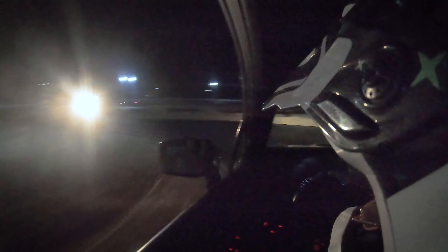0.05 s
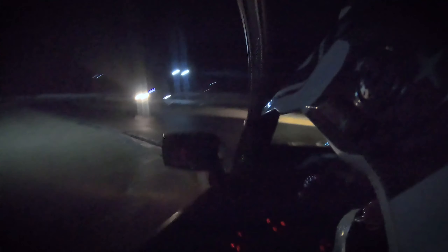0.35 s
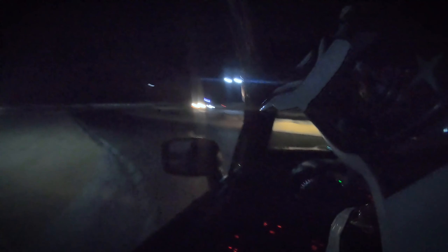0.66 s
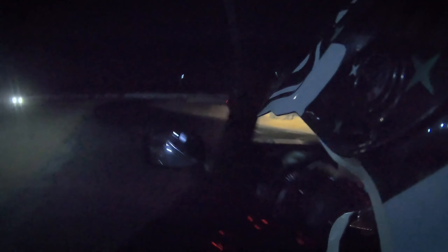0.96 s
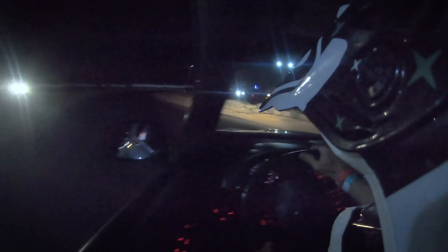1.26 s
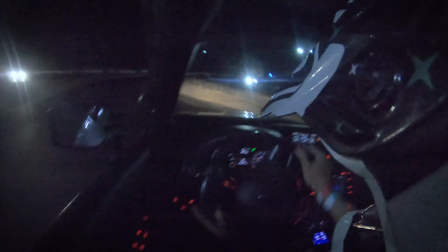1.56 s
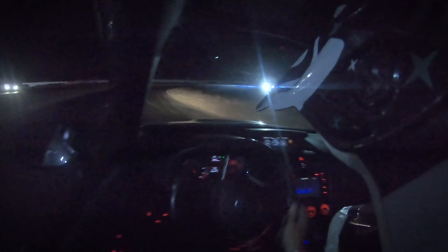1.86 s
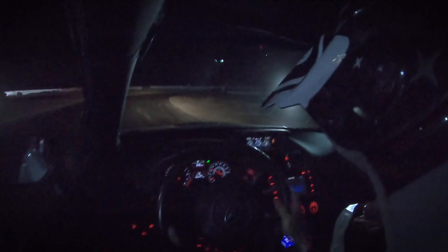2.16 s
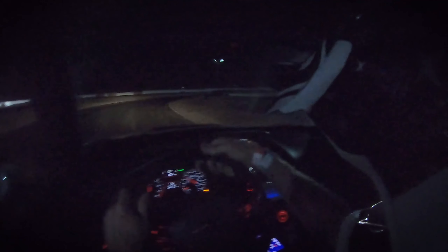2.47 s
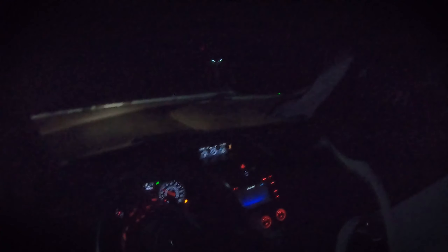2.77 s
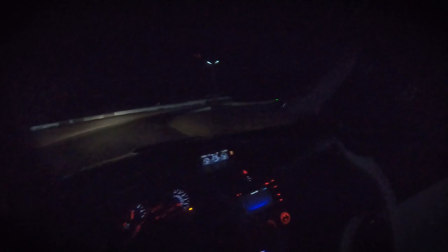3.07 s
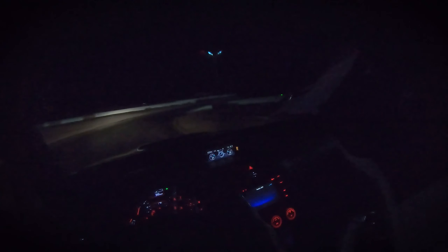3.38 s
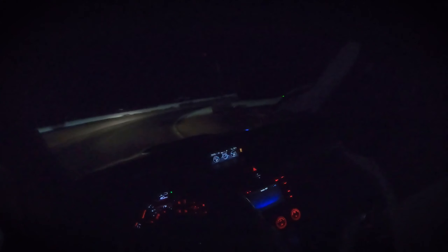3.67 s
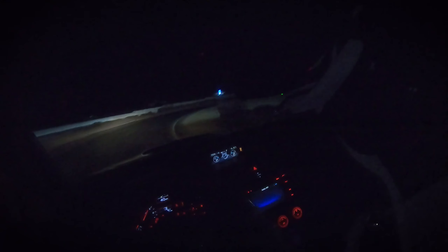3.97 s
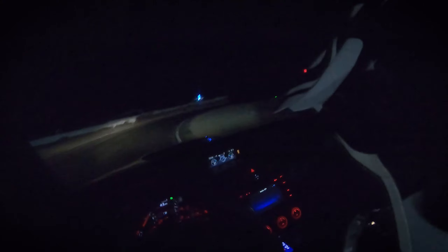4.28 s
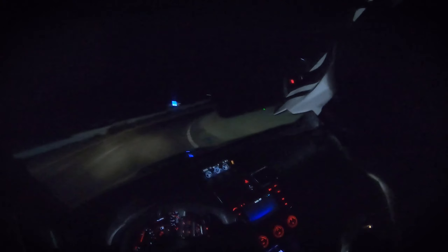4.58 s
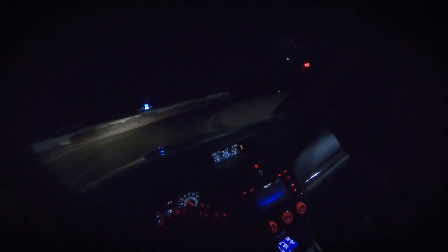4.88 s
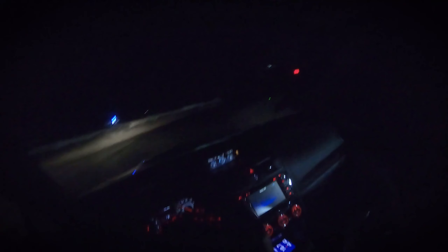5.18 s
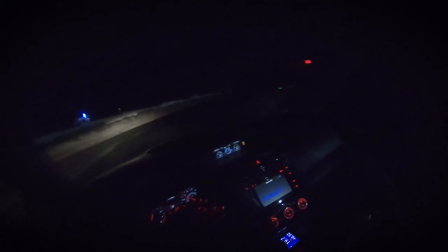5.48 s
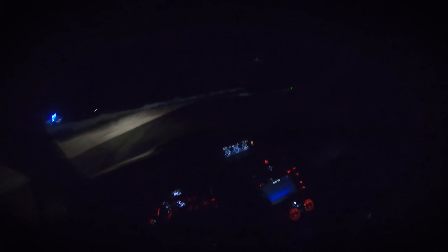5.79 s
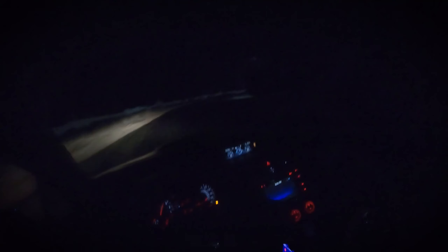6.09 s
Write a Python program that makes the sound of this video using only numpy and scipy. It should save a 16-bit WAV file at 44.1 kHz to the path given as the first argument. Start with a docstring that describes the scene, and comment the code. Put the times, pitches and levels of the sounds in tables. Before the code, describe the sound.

Heard from the cabin of a turbocharged car on a track, gusts buffet the microphones and set off dry clicks and rattles. As the wind drops, the engine swells into a booming drone, mixed with another car accelerating and shifting up. A rough screech, an intake bark and spurts of turbo hiss lead into a long, wavering tyre squeal above the rumble of the road.

```python
"""Wind thumps and crackles on a close microphone pair, inside a turbocharged car lapping at night with
the side window down; the jolts set off ticks and jingles. As the wind dies, the engine's firings boom
in the cabin and beat against a second car's engine outside. The intake growls, the turbo hisses, vents
and whistles, and the tyres stick and slip, squealing and scrubbing through a long corner over the road
roar. Near the end the microphones turn and the treble widens."""
import sys
import numpy as np
from scipy import signal
from scipy.fft import rfft, irfft
from scipy.io import wavfile
from scipy.ndimage import uniform_filter1d, minimum_filter1d, map_coordinates

SR = 44100
rng = np.random.default_rng(int(sys.argv[2]) if len(sys.argv) > 2 else 0)


def to_wav(s):
    """Save 16-bit WAV."""
    ch = np.atleast_2d(s).T  # columns
    pcm = np.round(np.clip(ch, -1, 1) * 32767)  # PCM
    wavfile.write(sys.argv[1], SR, pcm.astype(np.int16))


N = 279594
TIME = np.arange(N) / SR


def engine(rate, level, booms, orders, waver_db, uneven_db, slip_rad=0.18):
    """The firing rate and its octave swell in cabin resonances; uneven firings blur the weaker lines."""
    hz, level_db = curves(rate) + curves(level)
    boom_db, octave_db = (level_db + np.interp(f, *np.transpose(booms)) for f in (hz, 2 * hz))
    phase = phase_of(hz)
    out = amp(boom_db + waver_db * walk(67)) * np.sin(phase)
    out += amp(octave_db + waver_db * walk(44)) * np.sin(2 * phase)
    boom_gain = np.hypot(amp(boom_db), amp(octave_db))
    for multiple, db in orders:
        gain = boom_gain * amp(db + uneven_db * walk(25))
        out += gain * np.sin(multiple * (phase + slip_rad * walk(28)) + rng.uniform(0, 2 * np.pi))
    return np.sqrt(2) * out


# Firing rate of the car we ride in: t/s, f/Hz
OWN_RATE = [(0, 130), (2.2, 133), (2.93, 140), (3.3, 138.7), (3.6, 133), (4.45, 142.5), (4.65, 147.5),
            (5.0, 151.5), (5.45, 159.5), (6.05, 165.5), (6.34, 174)]
# How hard its engine works: t/s, level/dB
OWN_LOAD = [(0, -18.5), (2.15, -22.5), (2.4, -9), (2.799, -10.5), (2.92, -0.5), (3.6, 1), (4.0, -3.5),
            (6.15, -4.5), (6.3, -13)]
# Cabin response to it, at the microphones: f/Hz, level/dB
OWN_BOOM = [(134, -12), (143, -12.5), (152, -17), (168, -15), (255, -36), (272, -25), (286, -34),
            (305, -26.5), (320, -19.5), (336, -15), (350, -30)]
# Its weaker lines: multiple of the firing rate, level/dB against the boom
OWN_ORDERS = [(.5, -23.5), (1.5, -33), (2.5, -31), (3, -26), (4, -34), (5, -28.5), (7, -29)]

def own_engine():
    """Heard from on board, the exhaust booms and climbs slowly through the cabin's resonances."""
    return engine(OWN_RATE, OWN_LOAD, OWN_BOOM, OWN_ORDERS, waver_db=2.5, uneven_db=-0.5)


# Firing rate of the second car: t/s, f/Hz
OTHER_RATE = [(0, 86.67), (1.2, 92.9), (1.75, 97.2), (2.15, 104.7), (2.75, 120.6), (3.5, 144.7),
              (4.2, 162.8), (4.42, 165), (4.8, 134.9), (5.2, 133.7), (6.34, 147.2)]
# How near it sounds: t/s, level/dB
OTHER_NEAR = [(0, -10.5), (1.249, -0.5), (1.52, 3.5), (1.8, 0), (2.3, 1), (4.42, -0.5), (4.6, -14.5),
              (6.34, 4)]
# Response of our cabin to it: f/Hz, level/dB
OTHER_BOOM = [(90, -30), (102, -31.5), (110, -18.5), (121, -18), (133, -30), (145, -28.5), (152, -23),
              (166, -18.5), (192, -29), (211, -17.5), (232, -26), (252, -21.5), (264, -47), (292, -35),
              (320, -44)]
# Its weaker lines: multiple of the firing rate, level/dB against the boom
OTHER_ORDERS = [(1.5, -25.5), (3, -22.5), (3.5, -30), (4, -24), (5, -23.5), (6, -29)]

def other_engine():
    """Outside, farther off, a second car pulls through a gear and shifts up."""
    return engine(OTHER_RATE, OTHER_NEAR, OTHER_BOOM, OTHER_ORDERS, waver_db=2.6, uneven_db=4.0)


def burp(at_s=4.56, hz=190, db=-19, half_s=.06):
    """The second car's exhaust pipe swells briefly on its own note at the upshift."""
    return unit(np.sin(2 * np.pi * hz * TIME)) * amp(db) * bump(at_s, half_s)


# Front tyre's squeal, outside the car: t/s, f/Hz, level/dB
FRONT_TYRE = [(3.48, 840, -52), (3.53, 832, -28), (3.57, 814, -40), (3.6, 800, -26), (3.68, 805, -31.5),
              (3.71, 800, -38.5), (3.78, 797, -27), (3.86, 792, -31), (3.97, 802, -26), (4.05, 810, -24.5),
              (4.18, 815, -27.5), (4.3, 801, -23.5), (4.46, 785, -22.5), (4.57, 748, -21), (4.66, 708, -35),
              (4.73, 737.2, -34), (4.78, 783, -30.5), (4.88, 778, -27.5), (4.95, 730.2, -34),
              (5.02, 800, -22), (5.07, 735, -29), (5.17, 745, -30.5), (5.22, 798.6, -24),
              (5.26, 748.5, -20.5), (5.33, 715, -25.5), (5.44, 725, -32), (5.54, 789.6, -30),
              (5.63, 770, -26), (5.69, 805, -22), (5.77, 764, -21.5), (5.83, 795, -22), (5.89, 781.4, -27),
              (5.96, 785, -19.5), (6.05, 820, -31), (6.1, 835, -26), (6.2, 878, -26), (6.26, 909, -37.5),
              (6.3, 942, -43.5)]
# Rear tyre's squeal, outside the car: t/s, f/Hz, level/dB
REAR_TYRE = [(4.5, 923, -58.5), (4.64, 920, -32), (4.75, 945, -43), (4.81, 955, -27), (4.84, 940, -31),
             (4.86, 882, -26), (4.96, 870, -22.5), (5.0, 860, -29.5), (5.05, 890, -20), (5.11, 925, -26.5),
             (5.17, 965, -29.5), (5.21, 925, -27), (5.3, 948, -30.5), (5.36, 930, -30.5),
             (5.44, 925, -28.5), (5.53, 888, -26), (5.58, 915, -22), (5.68, 930, -31.5), (5.78, 920, -36.5),
             (5.95, 970, -58)]
# Harmonics of the stick-slip cycle, fundamental first: level/dB
SQUEAL_HARMONICS = [7.5, -8.5, -22.5, -43]

def squeal(table, wander, ragged, flutter_db, bright_db, slide_bright_db=0, shrill_db=-21):
    """Tread sticks and slips at one pitch; in a slide its timing and strength jump about more."""
    hz, db = curves(table)
    letting_go = slide() ** 2
    rough = .14 + .2 * letting_go
    hz = hz * (1 + rough * (.02 * walk(30.35) + wander * walk(60)))
    phase = phase_of(hz) + rough * ragged * walk(180)
    # Below shrill_db the overtones fade faster than the tone.
    overtone_db = bright_db + slide_bright_db * letting_go + 0.79 * np.minimum(db - shrill_db, 0)
    tone = np.sin(phase)
    for k, harmonic_db in enumerate(SQUEAL_HARMONICS[1:], 1):
        gain = amp(harmonic_db - SQUEAL_HARMONICS[0] + overtone_db + 2.6 * walk(72))
        tone += gain * np.sin((k + 1) * phase + k * .55 * walk(140))
    flutter = unit(amp(flutter_db * np.sqrt(rough) * walk(43)))
    return np.sqrt(2) * tone * flutter * amp(db) * (TIME > table[0][0])


# First rough screech of the corner: t/s, f/Hz, level/dB
SCREECH = [(3.0, 1022, -49.5), (3.1, 995.3, -34.5), (3.22, 968.5, -28), (3.4, 948, -24), (3.48, 936, -29),
           (3.56, 894, -38), (3.7, 880, -65)]
# Its close tones: pitch ratio, level/dB
SCREECH_PARTIALS = [(.87, -6), (.97, -5.5), (1.04, -6.5), (1.16, -7.5), (1.3, -9.5), (1.462, -6.5),
                    (1.59, -9.5)]

def screech(wander=.008, smear_rad=0.72, flutter_db=1.5):
    """A rough screech of several close tones that sink together."""
    hz, db = curves(SCREECH)
    out = 0
    for ratio, partial_db in SCREECH_PARTIALS:
        phase = phase_of(ratio * hz * (1 + wander * walk(40))) + smear_rad * walk(170)
        out += amp(partial_db + flutter_db * walk(50)) * np.sin(phase)
    return unit(out) * amp(db) * (TIME > SCREECH[0][0])


# Path from outside into the cabin: f/Hz, level/dB
WINDOW = [(600, -3.5), (1000, 1), (1350, -8.5), (1590, 3.5), (1750, -4), (2200, 4), (2450, 2), (3000, 17.5),
          (4500, -5.5), (8000, -11)]

def cornering():
    """The screech and both tyres' squeals are coloured on their way in through the open window."""
    front = squeal(FRONT_TYRE, wander=0.0249, ragged=0.57, flutter_db=3.5, bright_db=3, slide_bright_db=3)
    rear = squeal(REAR_TYRE, wander=0.014, ragged=1.7, flutter_db=3, bright_db=-6)
    return shape(front + rear + screech(), WINDOW)


def slide():
    """How far the tyres have let go, 0-1."""
    return swell(4.9, 5.57, rise_s=0.5, fall_s=0.31)


# Tread resonances: f/Hz, width/Hz, level/dB
TREAD_MODES = [(810, 110, 5.5), (1175, 130, 0), (1403, 110, 1.5), (1600, 230, -5.5), (2175, 100, -5)]

def scrub(db=-25.5, grain_db=0.5):
    """In the slide, many tread blocks slip out of step and excite the tread's resonances."""
    return resonate(noise() * amp(grain_db * walk(200)), TREAD_MODES) * amp(db) * slide()


# Force of the wind at the side window: t/s, level/dB
WIND_FORCE = [(0, -19), (.45, -17.5), (.88, -14), (1.12, -16), (1.27, -16.5), (1.42, -22), (1.66, -27),
              (1.82, -38.5)]
# Flaps of air on top of it: t/s, half length/s, buffet lift/dB, crackle lift/dB
GUSTS = [(.045, 0.02, 0.5, 8), (.095, 0.0093, 2.5, 6), (0.123, 0.011, 5, 7), (0.199, 0.015, 4.5, 3),
         (0.228, 0.015, 7, 10), (0.273, .012, 2.5, 3), (0.352, 0.019, 4, 3.5), (.38, 0.029, 7, 9),
         (0.411, 0.025, 2, 7.5), (0.476, 0.022, 4.5, 13), (0.515, 0.018, 7, 12.5), (0.552, 0.022, 2, 8.5),
         (0.594, 0.023, 7, 9), (0.669, .022, 4.5, 5.5), (0.734, .018, 2, 8.5), (.78, .018, 2, 4.5),
         (0.828, 0.043, 4.5, 5.5), (0.895, 0.023, 4, 8), (0.957, 0.024, 0, 1), (1.009, 0.036, 1, 7),
         (1.062, .02, 3, 9), (1.108, .012, 2, 4.5), (1.161, 0.0049, 11.5, -5), (1.211, .014, 6, 3.5),
         (1.235, 0.024, -2, 5.5), (1.303, 0.016, 5, 6.5), (1.33, 0.025, 4, 7), (1.37, 0.017, 5.5, 9),
         (1.4, .01, 12, 13), (1.478, 0.03, 3.5, 5), (1.504, 0.0086, 7, 5), (1.613, 0.021, 5, 3)]
# Spectrum of the buffeting: f/Hz, level/dB
BUFFET = [(12, -22.5), (25, -1.5), (70, 0.5), (120, 0), (200, -6.5), (320, -9), (500, -17.5), (900, -27),
          (1500, -80.5)]
# Spectrum of the crackle: f/Hz, level/dB
CRACKLE = [(200, -15.5), (380, 6.5), (600, 10.5), (1100, 5), (1600, -4.5), (2300, -10), (3300, -17.5),
           (5100, -26.5), (6000, -46), (8000, -44), (9500, -60.5), (12000, -72)]

def wind(eddy_db=0.73, tear_db=1.5, shelter_s=1.515):
    """Eddies thump right on the microphones and tear into crackle until the pair leaves the airstream."""
    force_db, = curves(WIND_FORCE)
    flaps = np.array([bump(s, half_s) for s, half_s, _, _ in GUSTS])
    thump_db, rip_db = np.transpose(GUSTS)[2:] @ flaps
    eddies = walk(90)
    bursts_db = 3 * walk(600)
    buffet = colour(noise() * amp(eddy_db * eddies), BUFFET) * amp(force_db + thump_db)
    crackle = colour(noise() * amp(tear_db * eddies + bursts_db), CRACKLE)
    crackle *= amp(1.53 * force_db - 7.5 + rip_db)  # grows faster with force than the buffeting
    return buffet + crackle * swell(0, shelter_s, rise_s=1, fall_s=.02)


# Gulp of each cylinder: level/dB
CYLINDER_DB = [-6, -9, -3, -3]
# Intake resonances under load: f/Hz, width/Hz, level/dB
GROWL_MODES = [(416, 57, -1), (504, 250, -1), (800, 140, -1), (1050, 70, -4.5), (1514, 140, -3.5),
               (1440, 100, -4.5), (2250, 140, -13)]
# Intake resonances in the bark: f/Hz, width/Hz, level/dB
BARK_MODES = [(411, 40, 1), (537, 46, 4), (695, 90, -11), (812, 66, 9.5), (954, 84, 10.5), (1072, 73, -5),
              (1195, 72, -2), (1402, 45, -0.5), (1557, 52, -2.5), (2077, 89, -6), (2231, 94, -5)]

def intake(growl_db=-43, scatter_db=1.6, jitter_cycles=.007, puff_cycles=0.5):
    """Four unequal gulps with puffs of air ring the intake: a growl under load, a bark as revs sag."""
    cycles = np.cumsum(curves(OWN_RATE)[0]) / SR + jitter_cycles * walk(110)
    firing = cycles.astype(int)
    size = amp(np.array(CYLINDER_DB)[firing % len(CYLINDER_DB)] + scatter_db * noise()[firing])
    gulps = unit(np.diff(firing, prepend=0) * size)
    air = unit(noise() * size * np.exp(-(cycles % 1) / puff_cycles))
    growl = resonate(gulps + air, GROWL_MODES) * amp(growl_db + curves(OWN_LOAD)[0])
    bark = resonate(gulps + amp(-6) * air, BARK_MODES)
    return growl + bark * swell(3.23, 3.46, rise_s=.07, fall_s=.065, db=-24)


# Turbo on boost: start t/s, end t/s, level/dB
BOOSTS = [(2.946, 3.85, -45), (5.348, 5.6, -59.5), (6.079, 6.303, -55.5)]
# Spectrum of the air in the ducts: f/Hz, level/dB
HISS = [(800, -35.5), (2200, 12), (3200, 8.5), (4500, -4.5), (6000, -7.5), (6900, -8.5), (8200, -8),
        (9500, -13.5), (11000, -19), (13000, -29.5), (15000, -39)]

def turbo_hiss(idle_db=-58.5, flutter_db=1):
    """Air hisses through the ducts on boost; off boost a faint flow follows the tyre roar."""
    boost = sum(swell(start, end, rise_s=.13, fall_s=0.32, db=db) for start, end, db in BOOSTS)
    _, roar_db = curves(ROAD)
    flow = np.hypot(boost, amp(roar_db - 40) + amp(idle_db))
    return colour(noise(), HISS) * flow * amp(flutter_db * walk(70))


def turbo_whistle(start_s=3.5, end_s=4.1, rise_s=0.18, start_hz=2233, coast_hz=1794, coast_s=0.41):
    """The compressor gives a broken, breathy whistle that sinks as it coasts."""
    coasting_s = np.maximum(TIME - start_s, -2 * rise_s)
    hz = coast_hz + (start_hz - coast_hz) * np.exp(-coasting_s / coast_s)
    tone = unit(np.sin(phase_of(hz) + 1.6 * walk(270)))
    return tone * swell(start_s, end_s, rise_s, fall_s=0.19, db=-39) * amp(1.6 * walk(21))


# Squeaks of the turbo plumbing: t/s, f/Hz, level/dB
SQUEAKS = [(3.745, 2070, -34.5), (3.9, 2880, -45), (4.049, 4550, -56)]

def squeaks(smear_rad=0.71, half_s=0.046):
    """Air forced through a narrow gap makes short, wavering tones."""
    return sum(unit(np.sin(2 * np.pi * hz * TIME + smear_rad * walk(150))) * amp(db) * bump(s, half_s)
               for s, hz, db in SQUEAKS)


# Spurts of vented boost: t/s, level/dB
SPURTS = [(3.362, -52), (3.385, -55), (3.417, -47), (3.446, -45), (3.474, -45), (3.492, -47), (3.511, -48),
          (3.535, -48), (3.568, -46), (3.627, -43.5), (3.659, -41.5), (3.688, -46), (3.718, -50),
          (3.745, -53), (3.778, -49), (3.803, -62), (3.824, -63), (3.88, -54), (3.895, -63), (3.924, -48),
          (3.948, -69), (3.982, -58)]
# Peaks of the rasp: f/Hz, width/Hz, level/dB
RASP_MODES = [(5100, 600, 3.5), (5960, 1300, 13), (6600, 940, -4.5), (7170, 840, 9.5), (7960, 670, 5),
              (8900, 910, 4.5), (9750, 600, -1.5), (10500, 600, -4), (11600, 1600, -6)]
# Duct resonances: f/Hz, width/Hz, level/dB
DUCT_MODES = [(2920, 63, 6.5), (3030, 120, 8), (3280, 54, -1.5), (3960, 130, 1.5), (4210, 200, 0.5),
              (4350, 170, -4.5), (4840, 180, -10.5), (6100, 300, -13.5), (7240, 200, -14.5),
              (8000, 300, -13), (9100, 250, -13.5)]

def vent(flutter_db=2.5, throb_db=3.5):
    """Spare boost spurts and leaks out in a rasp that throbs with the firings and rings the ducts."""
    leak = swell(3.66, 4.08, rise_s=0.054, fall_s=0.15, db=-45)
    spurts = pulses(SPURTS, rise_s=.006, fall_s=.014)
    throb = amp(throb_db * np.sin(phase_of(curves(OWN_RATE)[0])))
    rasp = resonate(noise() * throb * amp(flutter_db * walk(220)), RASP_MODES)
    duct = resonate(noise() * throb * amp(flutter_db * walk(10)), DUCT_MODES)
    return rasp * (spurts + amp(-22) * leak) + duct * np.hypot(leak, spurts)


# Road noise in the cabin: t/s, rumble level/dB, roar level/dB
ROAD = [(0, -43, -28), (1.4, -29.5, -34), (1.62, -21.5, -44), (1.8, -28, -42), (2.05, -26.5, -34),
        (2.27, -21, -26), (2.85, -19.5, -27.5), (3.25, -22.5, -21.5), (3.8, -25, -27.5),
        (4.4, -21.5, -27.5), (4.85, -19, -27), (5.3, -17.5, -23), (5.65, -18, -23.5), (6.34, -20, -27.5)]
# Spectrum of the body shell's rumble: f/Hz, level/dB
RUMBLE = [(12, -26), (24, 14.5), (35, 12), (50, 8.5), (75, 3.5), (110, 2.5), (150, 8), (220, -13),
          (320, -22), (600, -63.5)]
# Spectrum of the tyre roar: f/Hz, level/dB
ROAR = [(90, -8), (190, 12), (280, 4), (420, 2.5), (600, -2), (850, -6.5), (1200, -5), (1700, -9.5),
        (2300, -20), (3200, -28.5), (5000, -35.5), (6500, -48), (10000, -80)]

def road(grain_db=1):
    """Bumps shake the body shell around the microphones; the asphalt's grain roars in the tyres."""
    rumble_db, roar_db = curves(ROAD)
    rumble = colour(noise(), RUMBLE)
    roar = colour(noise() * amp(grain_db * walk(90)), ROAR)
    return rumble * amp(rumble_db) + roar * amp(roar_db)


# Ticks right at the microphones: t/s, peak level/dB, band f/Hz
TICKS = [(0.096, -16, 865), (0.196, -27, 1100), (0.236, -36, 1290), (.555, -26, 1700), (.644, -20.5, 1000),
         (0.688, -17, 1640), (0.7737, -9, 1100), (.854, -18.5, 1790), (0.888, -19, 6760), (.912, -21, 2500),
         (1.005, -10.5, 1740), (1.011, -21, 1920), (1.053, -25, 1900), (1.123, -30, 2200),
         (1.187, -40, 2000), (1.2415, -21, 1900), (1.287, -24.5, 2170), (1.376, -31, 2080),
         (1.509, -23, 790)]

def ticks(decay_s=0.0023, snap_db=12, top_hz=10500):
    """Gusts jolt the handheld rig into dry cracks, each a snap with a brief noisy tail."""
    out = np.zeros(N)
    for s, db, hz in TICKS:
        age = TIME - s
        tail = noise() * (age > 0) * np.exp(-np.abs(age) / decay_s)
        snap = amp(snap_db) * np.diff(1. * (age > 0), prepend=0)
        band = signal.butter(3, [hz / 2, hz * 1.4], "bandpass", fs=SR, output="sos")
        crack = signal.sosfilt(band, snap + tail)
        out += crack * amp(db) / np.abs(crack).max()
    return signal.sosfilt(signal.butter(10, top_hz, fs=SR, output="sos"), out)


# Knocks of the trim: t/s, level/dB
KNOCKS = [(1.457, -26), (1.507, -23), (1.548, -40), (1.566, -36), (1.612, -34), (1.632, -41), (1.67, -35.5),
          (1.69, -31)]
# Trim resonances: f/Hz, width/Hz, level/dB
KNOCK_MODES = [(570.4, 86, 5), (810, 220, -15), (1350, 200, -19), (1870, 150, -7.5)]

def knocks():
    """Loose trim nearby in the cabin chatters with a hollow ring."""
    return resonate(noise(), KNOCK_MODES) * pulses(KNOCKS, rise_s=.002, fall_s=0.0092)


# Clinks of something small and metal: t/s, level/dB
CLINKS = [(0.876, -47), (.985, -55), (1.006, -56), (1.046, -61), (1.125, -67), (1.2, -70), (1.23, -69),
          (1.283, -67), (1.313, -65), (1.37, -71), (1.445, -71), (1.5, -75)]
# Resonances of the metal: f/Hz, width/Hz, level/dB
CLINK_MODES = [(7570, 90, -6), (7700, 260, 2), (8780, 130, -2), (9500, 90, -6), (9890, 190, -14)]

def jingle():
    """Loose bits of metal chatter faintly together and ring briefly after each jolt."""
    return resonate(noise(), CLINK_MODES) * pulses(CLINKS, rise_s=0.0037, fall_s=.02)


def amp(db):
    """Decibels to gain."""
    return 10 ** (np.asarray(db) / 20)


def unit(x):
    """Scale to rms 1."""
    return x / np.sqrt(np.mean(x ** 2))


def noise():
    """White noise."""
    return rng.standard_normal(N)


def walk(rate):
    """Smooth random drift that changes about rate times a second; rms 1."""
    f = np.fft.rfftfreq(N, 1 / SR)
    return unit(irfft(rfft(noise()) / (1 + (2 * f / rate) ** 4), N))


def phase_of(hz):
    """Running phase of a gliding pitch, in radians."""
    return 2 * np.pi * np.cumsum(hz) / SR


def curves(table):
    """Each column of a table of timed rows, for every sample."""
    s, *columns = np.transpose(table)
    return [np.interp(TIME, s, c) for c in columns]


def bump(at_s, half_s):
    """Bell-shaped envelope peaking at 1."""
    return np.exp(-((TIME - at_s) / half_s) ** 2)


def swell(start_s, end_s, rise_s, fall_s, db=0):
    """Exponential attack up to start_s, hold at db, exponential release after end_s."""
    fade = np.maximum(start_s - TIME, 0) / rise_s + np.maximum(TIME - end_s, 0) / fall_s
    return amp(db) * np.exp(-np.minimum(fade, 60))


def pulses(table, rise_s, fall_s):
    """Envelope with a sharp peak at each (t/s, level/dB) row."""
    return sum(swell(s, s, rise_s, fall_s, db) for s, db in table)


def shape(x, points):
    """Filter by a response of (f/Hz, level/dB) points."""
    hz, db = np.transpose(points)
    f = np.maximum(np.fft.rfftfreq(N, 1 / SR), 1)
    return irfft(rfft(x) * amp(np.interp(np.log(f), np.log(hz), db)), N)


def colour(x, points):
    """Filter like shape, falling 36 dB an octave above the last point; rms 1."""
    top_hz, top_db = points[-1]
    return unit(shape(x, list(points) + [(top_hz * 4, top_db - 72)]))


def resonate(x, modes):
    """Steep resonances (f/Hz, width/Hz, level/dB) side by side; rms 1."""
    out = 0
    for hz, width, db in modes:
        b, a = signal.iirpeak(hz, 2 * hz / (np.pi * width), fs=SR)
        out += amp(db) * unit(signal.lfilter(b, a, signal.lfilter(b, a, x)))
    return unit(out)


# Share of the sound that differs between left and right: f/Hz, level/dB
SPREAD = [(100, -70.5), (500, -67), (2000, -56), (4000, -37), (8000, -23), (12000, -10)]
# Extra share once the pair has turned: f/Hz, level/dB
TURNED_SPREAD = [(100, -37), (300, -25), (550, -12), (1200, -14.5), (2800, -3.5), (7000, 3), (10000, 6),
                 (13000, -16)]

def stereo(mid, spread_decay_s=.016, turn_s=(5.65, 6.1), left_db=1.05, left_lead_s=2e-5):
    """The treble differs faintly between left and right; after the turn the difference grows and left leads."""
    diffusion = noise() * np.exp(-TIME / spread_decay_s)
    diffuse = signal.fftconvolve(mid, diffusion / np.linalg.norm(diffusion))[:N]
    turn = np.interp(TIME, turn_s, (0, 1))
    side = shape(diffuse, SPREAD) + turn * shape(diffuse, TURNED_SPREAD)
    right = map_coordinates(mid - side, [(TIME - left_lead_s * turn) * SR], mode="mirror")
    return np.array([mid + side, right]) * amp(left_db * np.array([turn, -turn]) / 2)


def scene():
    """Inside the car, by the open window: every source reaches both microphones nearly alike."""
    engines = own_engine() + other_engine() + burp()
    driving = cornering() + scrub() + road()
    breathing = intake() + turbo_hiss() + turbo_whistle() + squeaks() + vent()
    return stereo(engines + driving + breathing + wind() + jingle() + ticks() + knocks())


def record(dry, ceiling=.63, hold_s=0.037, top_hz=15100):
    """A limiter ducks smoothly around the loudest peaks; the top is cut."""
    span = int(hold_s * SR)
    needed = np.minimum(1, ceiling / (np.abs(dry).max(axis=0) + 1e-9))
    held = minimum_filter1d(needed, span)
    gain = uniform_filter1d(uniform_filter1d(held, span // 2), span // 2)
    return signal.sosfilt(signal.ellip(8, .2, 70, top_hz, fs=SR, output="sos"), dry * gain)


dry = scene()
out = record(dry)
to_wav(out)
```